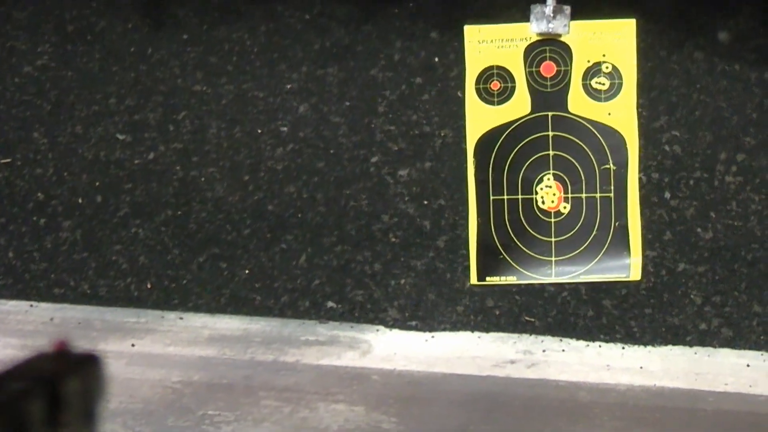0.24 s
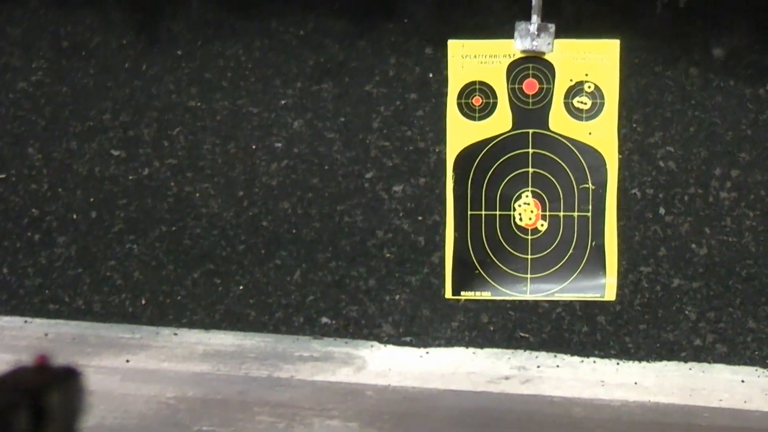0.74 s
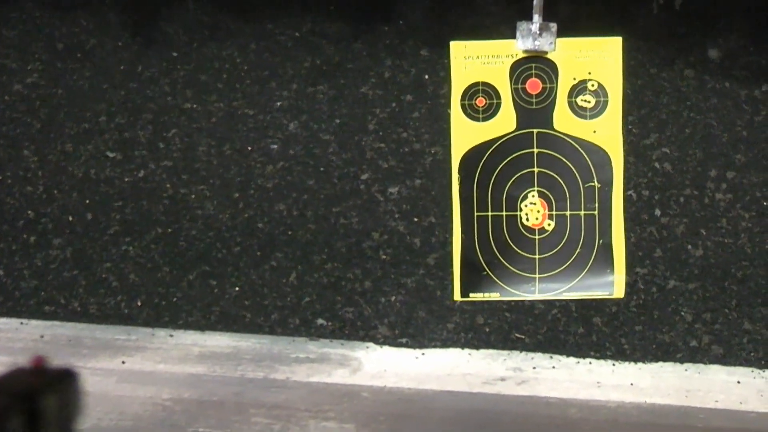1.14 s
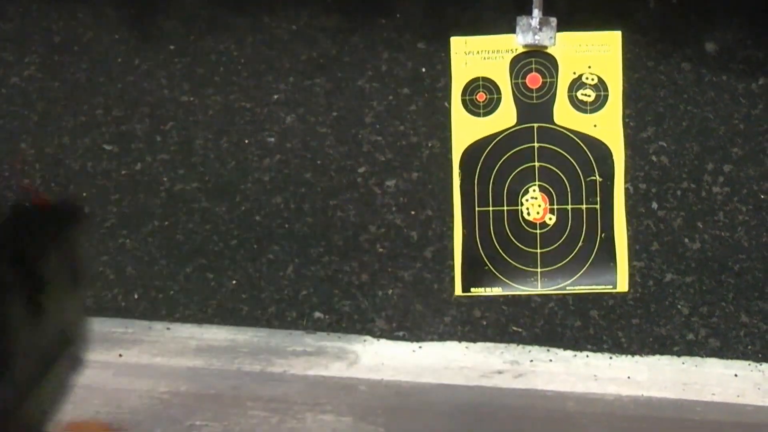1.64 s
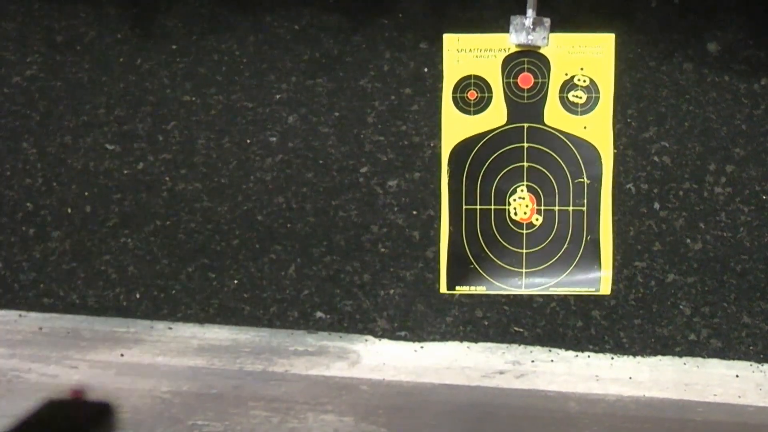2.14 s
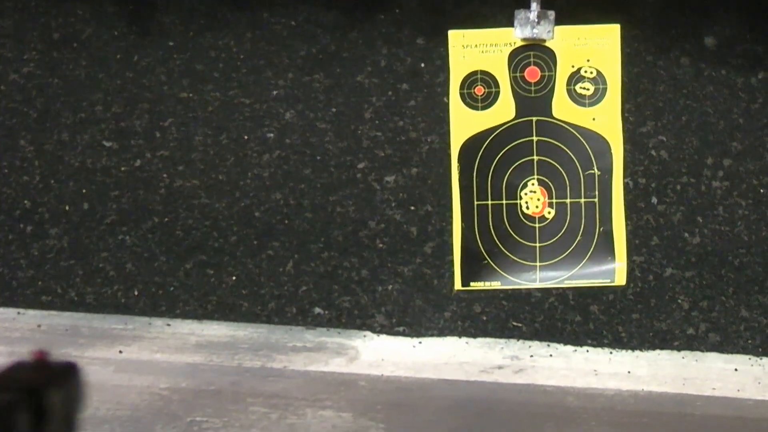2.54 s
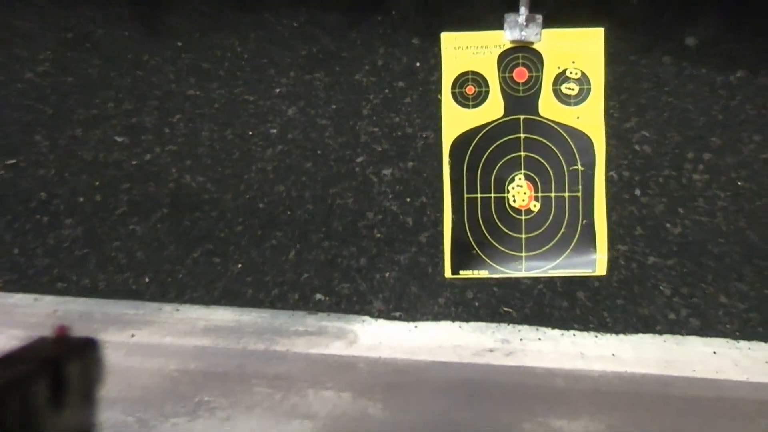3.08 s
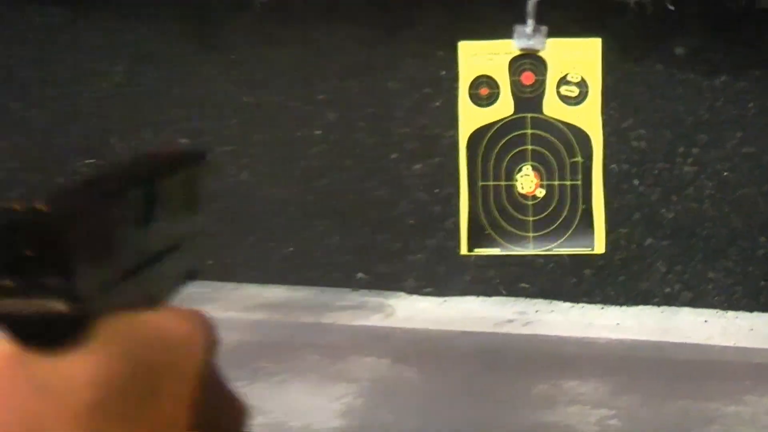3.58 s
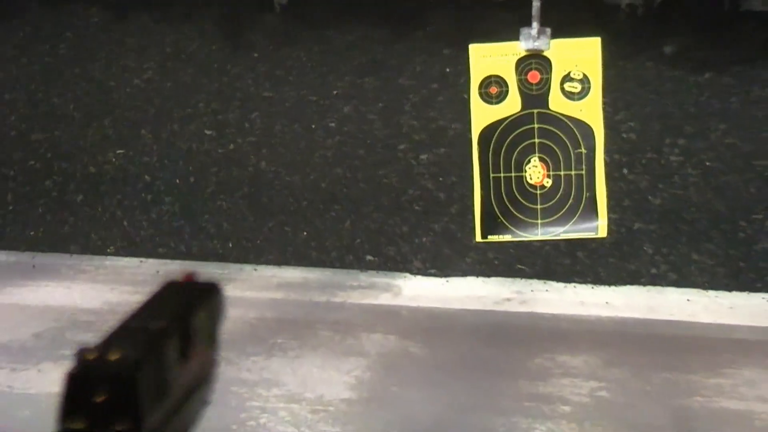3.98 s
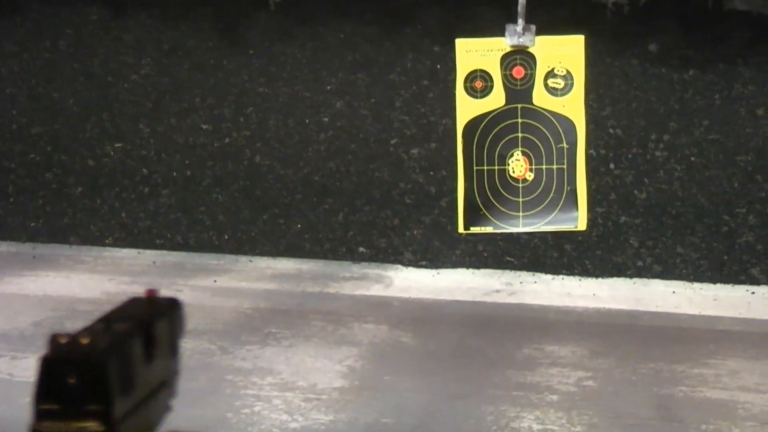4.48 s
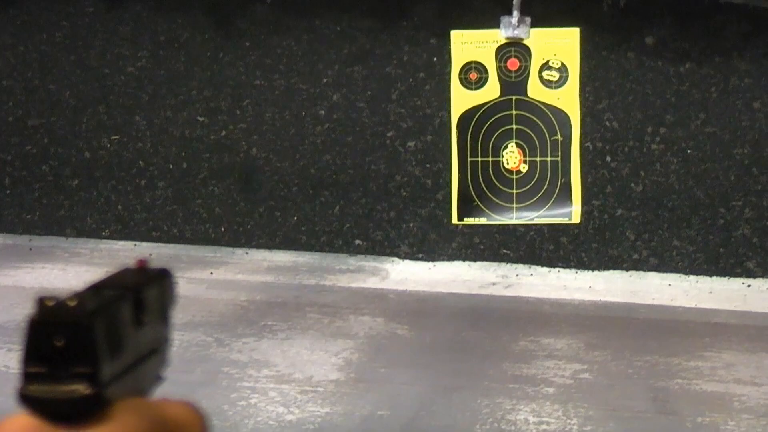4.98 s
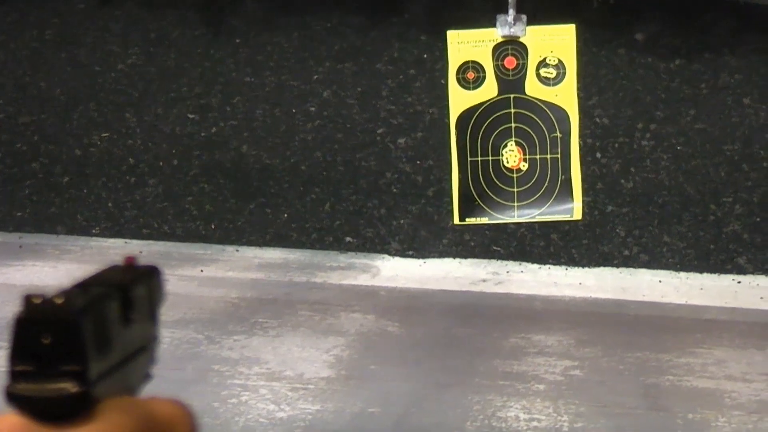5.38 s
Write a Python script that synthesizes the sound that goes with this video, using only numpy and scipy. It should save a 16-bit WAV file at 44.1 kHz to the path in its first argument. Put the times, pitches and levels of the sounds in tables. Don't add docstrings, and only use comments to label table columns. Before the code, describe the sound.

A long, hard-walled indoor shooting range, heard from a small stereo camera microphone close to the gun. At the start the echo of an earlier shot is sinking into quiet ventilation hum; a brass case rings faintly near 0.6 s, and ticks, scrapes and two dull bumps through the walls come around 1.0-1.1 s. A handgun blasts at 1.24 s and again at 1.5 s, nearly merging. Each shot is a bright, flattened crack with a swelling hall echo, a rising boom and a slap from the far wall about an eighth of a second later, then falls away quickly as the gain control lets go. Casings tick and skid from 2.0 to 2.8 s, most thickly around 2.35-2.6. Shots follow at 2.86 and 3.56 s, with a brief metallic ring near 3.0. Brass pings at 4.2 and ticks and scrapes at 4.5-4.9 s, before the last shot at 5.01 s, its echo decaying to the end.

```python
import sys
import numpy as np
from scipy import signal
from scipy.fft import rfft, irfft
from scipy.io import wavfile
from scipy.ndimage import uniform_filter1d, map_coordinates

SR = 44100
rng = np.random.default_rng(int(sys.argv[2]) if len(sys.argv) > 2 else 0)


def volts_from_db(level):
    exponent = np.asarray(level, float) / 20
    return 10 ** exponent


def log_audio(samples):
    frames = np.atleast_2d(samples).T
    limited = np.clip(frames, -1, 1)
    pcm = np.round(limited * 32767).astype(np.int16)
    wavfile.write(sys.argv[1], SR, pcm)


N = 247842


def unit(x):
    return x / np.sqrt(np.mean(x ** 2) + 1e-20)


def along(points, hz):
    f, v = np.transpose(points)
    return np.interp(np.log(hz + 1), np.log(f + 1), v)


# f/Hz, side minus mid/dB
WIDTH_DB = [(60, -9), (130, -16.5), (290, -19.5), (640, -14), (1410, -8), (3100, -8.5), (6820, -9),
            (15000, 10)]


def diffuse(seconds, gain):
    hz, t, z = signal.stft(rng.standard_normal((2, round(seconds * SR))), SR, nperseg=512)
    turn = np.arctan(volts_from_db(along(WIDTH_DB, hz)))[:, None]
    mid = z[0] * np.cos(turn)
    side = z[1] * np.sin(turn)
    return signal.istft(np.array([mid + side, mid - side]) * gain(hz[:, None], t), SR, nperseg=512)[1]


def burst(gain):
    return unit(diffuse(0.5, gain))[:, :SR // 2]


def coloured(points):
    return burst(lambda hz, t: volts_from_db(along(points, hz) + 0 * t))


def add(track, s, sound):
    part = track[:, SR + round(s * SR):][:, :sound.shape[1]]
    part += sound[:, :part.shape[1]]


SHOT_TIMES_S = [
    -0.62,
    1.237,
    1.504,
    2.862,
    3.555,
    5.014,
]
# far-wall slap/dB, boom/dB, brightness/dB
SHOT_LEVELS = [(0, -9, 3.5), (0.5, -3, 2.5), (-8, -6.5, 0.88), (-3.5, -3, 2.5), (-6, -6.5, 1.04),
               (-2.5, -6.5, 2.5)]
# f/Hz, density/dB per Hz
HALL_DB = [(18, -74), (30, -32.5), (122, -8), (149, -2), (309, -5), (350, -3.5), (439, -7.5), (724, 3),
           (1230, -4.5), (1320, -5.5), (1420, -8), (5950, -23.5), (12000, -51), (15600, -96.5),
           (22000, -120)]
# f/Hz, t60/s
HALL_T60_S = [(60, 1.72), (200, 0.81), (800, 1.012), (2000, 0.95), (5000, 0.87), (8000, 0.78),
              (11000, 0.76), (14000, 1.1)]
# f/Hz, rise/s
HALL_RISE_S = [(100, 0.006), (500, 0.012), (2000, 0.013), (8000, 0.0017)]
# f/Hz, density/dB per Hz
CRACK_DB = [(200, 3.5), (700, -3), (2000, -4), (6000, -4.5), (12000, -19), (16000, -18.5)]


def shots():
    out, t = np.zeros((2, N + SR)), np.arange(SR // 2) / SR
    for s, (slap_db, boom_db, bright_db) in zip(SHOT_TIMES_S, SHOT_LEVELS):
        def hall(hz, t):
            level_db = along(HALL_DB, hz) + bright_db * np.log2((hz + 1000) / 2000)
            decay_db = 60 * (t - 0.55) / along(HALL_T60_S, hz)
            return volts_from_db(level_db - decay_db) * (1 - np.exp(-t / along(HALL_RISE_S, hz)))

        echo = diffuse(2, hall)
        add(out, s + 0.008, echo / np.std(echo[:, :SR // 5]))

        low_pass = signal.butter(2, 220, fs=SR, output="sos")
        low_noise = unit(signal.sosfilt(low_pass, rng.standard_normal((2, len(t)))))
        add(out, s + 0.01058, volts_from_db(-60 * t / 0.43) * (1 - np.exp(-t / 0.022)) * low_noise)

        crack = coloured(CRACK_DB)
        add(out, s, volts_from_db(-7 - 60 * t / 0.28) * crack)

        lead = crack[:, -900:] + echo[:, 5000:5900] / np.std(echo[:, 5000:5900])
        lead = lead + 1.6 * rng.standard_normal((2, 900))
        add(out, s - 900 / SR, volts_from_db(-47.5) * lead * np.linspace(0.05, 1, num=900))

        slap = crack[::-1, ::-1]
        add(out, s + 0.123, volts_from_db(slap_db - 60 * t / 0.16) * (1 - np.exp(-t / 0.0029)) * slap)

        flutter = uniform_filter1d(rng.standard_normal((2, len(t))), size=200) * 2.55
        glide_hz = (220 + 480 * (1 - np.exp(-t / 0.07))) * (1 + flutter)
        swell = (t / 0.055) * np.exp(1 - t / 0.043)
        boom = np.sin(2 * np.pi * np.cumsum(glide_hz, axis=1) / SR) * swell
        add(out, s + 0.02, volts_from_db(boom_db + 7.5) * boom)
    return out[:, SR:]


# f/Hz, density/dB per Hz
TICK_DB = [(800, -15), (2500, 0), (5000, -4.5), (9000, -15), (13000, -27), (16000, -23)]
# f/Hz, density/dB per Hz
SNAP_SPECTRUM_DB = [(3000, -30), (6000, 5), (10000, 0), (14000, -6.5), (16000, -18.5)]
# t/s, peak level/dB, ring f/Hz, tick/dB
LANDINGS = [
    (0.5773, -60, 11400, -10.5),
    (0.942, -72, 10900, -7),
    (1.0574, -60, 11500, -1),
    (2.2613, -68, 11500, -5),
    (4.6404, -72, 11200, -8),
    (4.8569, -59, 11200, 1),
]
# t/s, peak level/dB, ring f/Hz, t60/s, tick/dB
BOUNCES_NEAR = [(4.1744, -25, 7000, 0.15, -6.5), (4.7296, -58, 7090, .16, -17),
                (4.854, -54, 6700, 0.22, 3.5), (1.975, -40.5, 12000, .1, 14), (2.353, -46, 5770, .044, 2),
                (2.525, -54, 8000, .05, 4), (2.554, -45, 5500, .08, 5), (2.564, -39, 8000, .05, 1.5),
                (2.566, -45.5, 4750, .2, -6), (2.684, -47, 8000, 0.026, -1), (2.817, -52, 5800, .05, 4),
                (3.270, -49, 14100, 0.11, 3), (4.179, -49, 11700, .21, 4), (4.200, -62, 7000, 1.2, -20),
                (4.728, -60, 8890, .1, 2), (4.5, -59, 13500, .11, 6), (0.577, -56.5, 6000, .06, 7),
                (2.354, -30, 2000, 0.051, -19), (4.4672, -34.5, 3540, 0.054, -24),
                (2.984, -12, 3800, .12, -19), (2.352, -60, 13500, .12, 3), (4.176, -58, 13400, .25, 3),
                (3.28, -48, 11700, .4, -12)]
# t/s, peak level/dB, t60/s
SKIDDING = [
    (1.046, -41, 0.36),
    (1.121, -38, 0.23),
    (2.5258, -40, 0.28),
    (2.5787, -37.5, 0.2),
    (2.8165, -64, 0.083),
    (4.632, -35, 0.27),
    (4.665, -35, 0.2),
    (4.8542, -54, 0.18),
]


def cases():
    landing_t60_s, landing_pan_db, bounce_pan_db = 0.46, 7, 1
    spin_per_s, spin_depth_db, snap_db = 25.6, 6.5, 2
    out, t = np.zeros((2, N + SR)), np.arange(SR // 2) / SR
    hits = [(s, db, hz, landing_t60_s, tick_db, landing_pan_db) for s, db, hz, tick_db in LANDINGS]
    hits += [(*row, bounce_pan_db) for row in BOUNCES_NEAR]
    for s, db, hz, t60, tick_db, pan_db in hits:
        waver = np.cumsum(rng.standard_normal((2, len(t))), axis=1) * 0.087
        spin = map_coordinates(rng.standard_normal(64), [t * spin_per_s])
        ring = np.sin(2 * np.pi * hz * t + waver) * volts_from_db(spin_depth_db * spin * np.minimum(t / 0.05, 1))
        ring = ring * volts_from_db(-60 * t / max(t60, 0.01)) * (1 - np.exp(-t / 0.0013))
        tick = coloured(TICK_DB) * (volts_from_db(-60 * t / 0.03) + volts_from_db(-4.5 - 60 * t / 0.3))
        tick += volts_from_db(snap_db - 60 * t / 0.012) * coloured(SNAP_SPECTRUM_DB)
        sides = volts_from_db(db + np.array([[pan_db], [-pan_db]]) / 2)
        add(out, s, sides * (1.04 * ring + volts_from_db(tick_db - 6.5) * tick))
    for s, db, t60 in SKIDDING:
        envelope = volts_from_db(db - 16 - 60 * t / max(t60, 0.02)) * (1 - np.exp(-t / 0.0059))
        add(out, s, envelope * coloured(TICK_DB))
    return out[:, SR:]


# t/s, peak level/dB, t60/s
THUDS = [
    (1.029, -34, 0.3),
    (1.113, -30.5, 0.2),
]


def bumps():
    out, t = np.zeros((2, N + SR)), np.arange(SR // 2) / SR
    for s, db, t60 in THUDS:
        thud = burst(lambda hz, t: 1 / (1 + (hz / 220) ** 4) * hz / (hz + 60) + 0 * t)
        add(out, s, volts_from_db(db - 8.5 - 60 * t / t60) * (1 - np.exp(-t / 0.0072)) * thud)
    return out[:, SR:]


# f/Hz, density/dB per Hz
VENT_DB = [(18, -65), (30, -32), (86, 0), (317, -5), (387, -7), (781, -5), (1500, -19), (1660, -15.5),
           (6250, -30.5), (8030, -44), (12000, -66), (15600, -73), (22000, -120)]
# f/Hz, width/Hz, level/dB
DUCT_MODES = [(151.4, 11, 0), (670, 33, -5.5), (710, 13, -4), (826, 40, 0), (950, 25, -11)]


def ventilation():
    def air_gain(hz, t):
        patches = uniform_filter1d(rng.standard_normal((len(hz), len(t))), 6, 0)
        return volts_from_db(along(VENT_DB, hz) + 2 * unit(uniform_filter1d(patches, 30, 1)))

    air = unit(diffuse(N / SR + 0.11, air_gain))[:, :N]
    noise = diffuse(N / SR + 0.1, lambda hz, t: 1)[:, :N]
    hum = 0
    for hz, width, db in DUCT_MODES:
        mode = signal.lfilter(*signal.iirpeak(hz, hz / max(width, 3), SR), noise)
        hum = hum + volts_from_db(db) * unit(mode)
    return volts_from_db(-64.5) * (air + volts_from_db(-6.0) * hum)


STEP_S = 0.026
# t after shot/s, level into the inputs/dB, left-right/dB
RIDE_DB = [(0, 1.5, 6), (.06, 2, -3), (.12, -3, -3.5), (.18, -5, -3), (.28, -11.5, -4), (.34, -13, -4.5),
           (.44, -15, -4), (.52, -14.5, -1.4), (.75, -21, -4.7)]


def ride(after, let_go, fall_db, floor_db, wake, tail_db):
    step_db, creep_db_per_s, turn_s, floor_pan_db = 1.5, 24, 0.12, -3.5
    s, ride_db, pan_db = np.transpose(RIDE_DB)
    gone = np.maximum(after - let_go, 0)
    share = np.clip(gone / STEP_S, 0, 1)
    echo_db = np.interp(np.minimum(after, let_go), s, ride_db) - step_db * share - fall_db * gone
    air_db = floor_db + creep_db_per_s * np.maximum(after - wake, 0)
    tail_pan = np.interp(after - wake, [-turn_s, turn_s], [tail_db, floor_pan_db])
    level = 10 * np.log10(volts_from_db(2 * echo_db) + volts_from_db(2 * air_db))
    return level, (1 - share) * np.interp(after, s, pan_db) + share * tail_pan


def loudness(air, size, origin=0):
    return np.sqrt(np.abs(uniform_filter1d(np.mean(air ** 2, 0), size=size, origin=origin)) + 1e-16)


# lets go after/s, fall/dB per s, floor/dB, wakes after/s, tail left-right/dB
LET_GO_ROWS = [(0.64, 51.5, -54, 1.52, 1), (.6, 50, -47.5, 1.2, 0), (0.57, 54.5, -40, 1.3, -1.5),
               (0.64, 44, -36, 1.2, -3), (0.44, 49, -47, 1.21, 0), (.62, 50, -50, 1.2, 0)]


def gain_control(air):
    lead_s, lead_from_db, lead_to_db, lead_pan_db = 0.025, -58, -35, 7
    short_share, catch_s = 0.82, 0.015
    settle_s = 0.25
    lumps = 1.5
    now = np.arange(N) / SR
    fast = loudness(air, 300, 110)
    slow = loudness(air, 2400, 800)
    crest = loudness(air, 70)
    level, pan, calm = np.zeros(N), np.zeros(N), np.ones(N)
    for shot, row in zip(SHOT_TIMES_S, LET_GO_ROWS):
        after = now - shot
        before = after < 0
        new, new_pan = ride(after, *row)
        eased = np.interp(after, [settle_s, settle_s + 0.06, row[0], row[0] + STEP_S], [0, lumps, lumps, 1])
        calm = np.where(before, calm * np.clip(-(after + lead_s) / lead_s, 0, 1), eased)
        gap = short_share * min(np.interp(shot - lead_s, now, level) - RIDE_DB[0][1], 0)
        lead = np.interp(after, [-lead_s - 1e-3, -lead_s, 0], [-120, lead_from_db, lead_to_db])
        share = volts_from_db(2 * lead) / (volts_from_db(2 * lead) + volts_from_db(2 * level))
        pan = np.where(before, pan + share * (lead_pan_db - pan), new_pan)
        led = level - 10 * np.log10(1 - share + 1e-9)
        level = np.where(before, led, new + gap * np.exp(-np.abs(after) / catch_s))
    eased = np.minimum(calm, 1)
    levelled = air / (fast ** (1 - eased) * slow ** eased)
    lumpy = levelled * (crest / slow) ** (calm - eased)
    return lumpy * volts_from_db(level + np.array([pan, -pan]) / 2)


def scene():
    return gain_control(shots() + ventilation()) + cases() + bumps()


# f/Hz, left-right/dB
MIC_LEAN_DB = [(60, 1.5), (240, 3.5), (950, 3), (3770, 1), (15000, 1.5)]


def top_cut(x):
    return signal.sosfilt(signal.butter(12, 15870, fs=SR, output="sos"), x)


def record(dry):
    flat = dry / (1 + np.abs(dry / 0.43) ** 5.1) ** (1 / 5.36)
    coupled = signal.sosfilt(signal.butter(2, 90, "high", fs=SR, output="sos"), flat)
    lean = along(MIC_LEAN_DB, np.fft.rfftfreq(N, 1 / SR)) / 2
    mix = irfft(rfft(coupled) * volts_from_db([lean, -lean]), N)
    return top_cut(mix)


dry = scene()
out = record(dry)
log_audio(out)
```